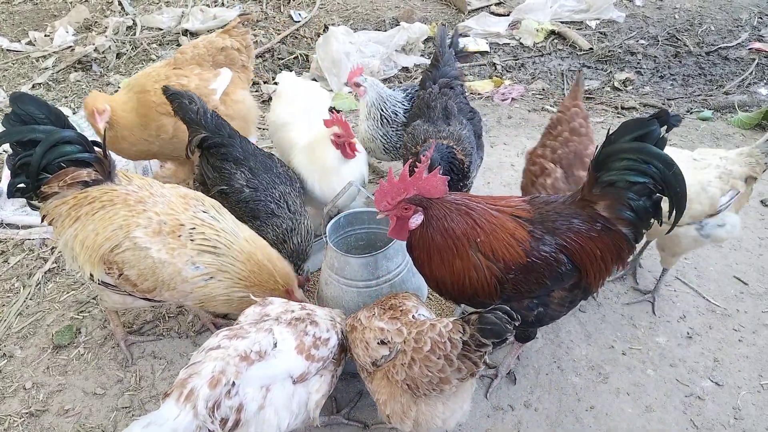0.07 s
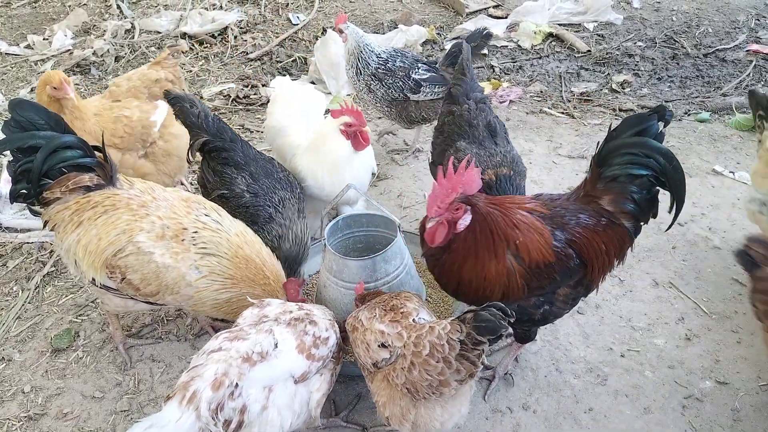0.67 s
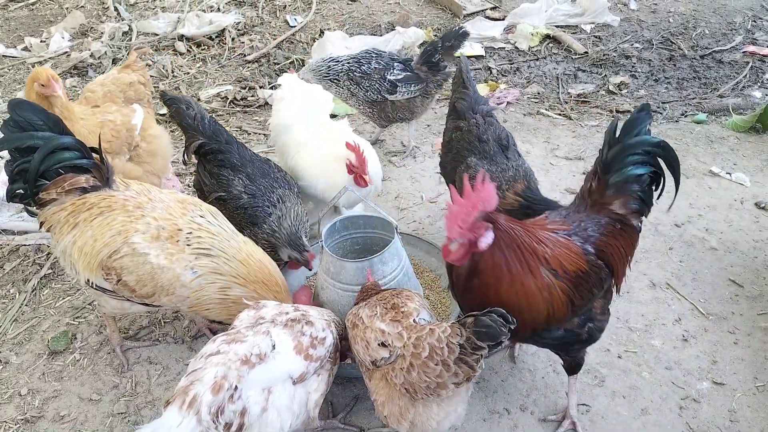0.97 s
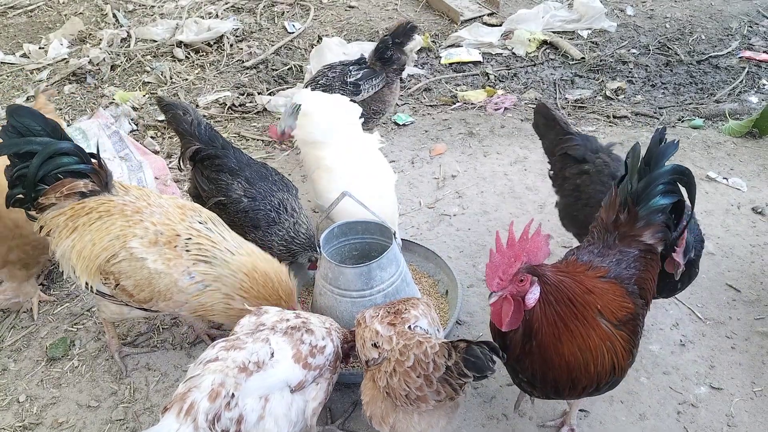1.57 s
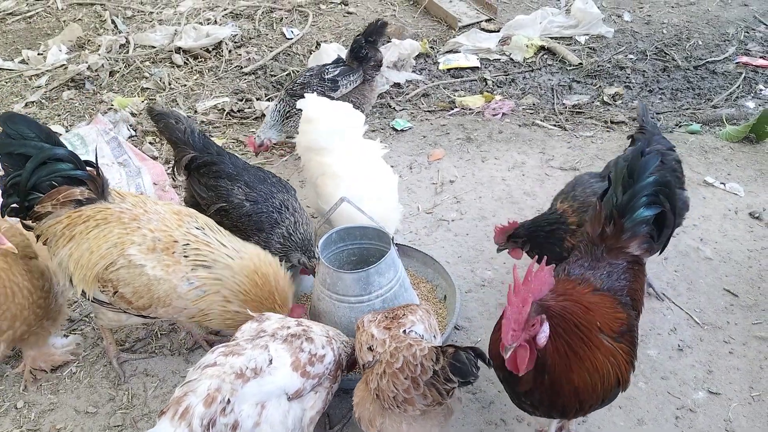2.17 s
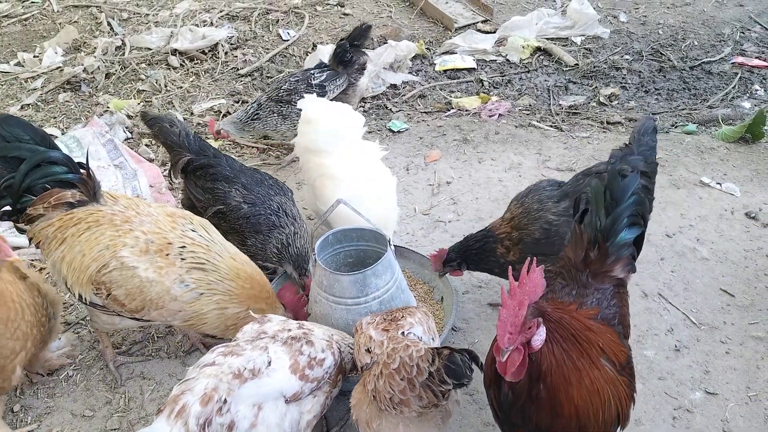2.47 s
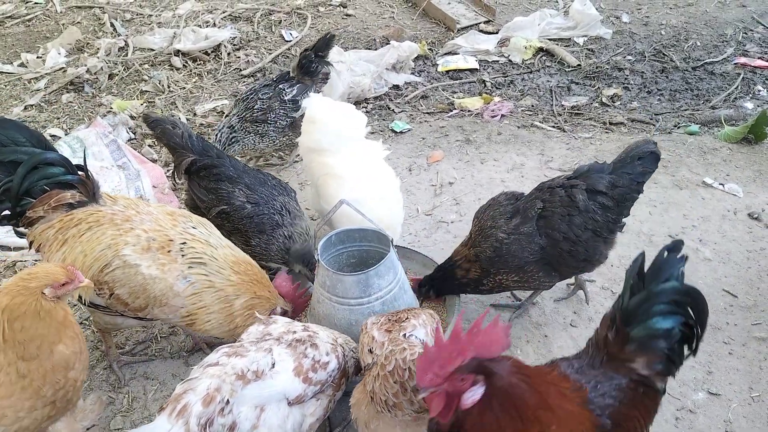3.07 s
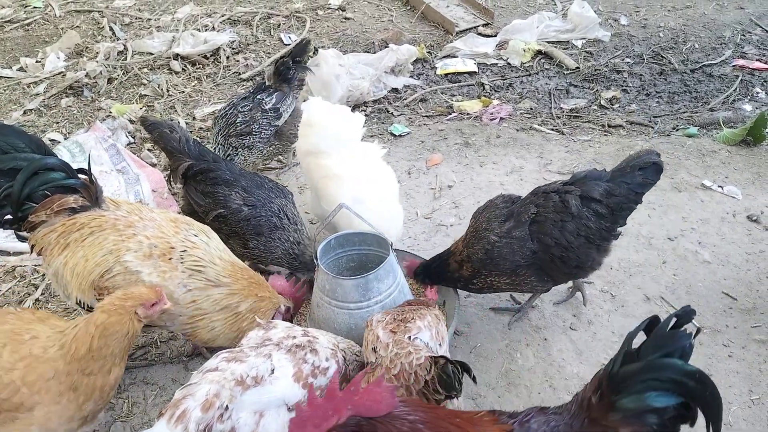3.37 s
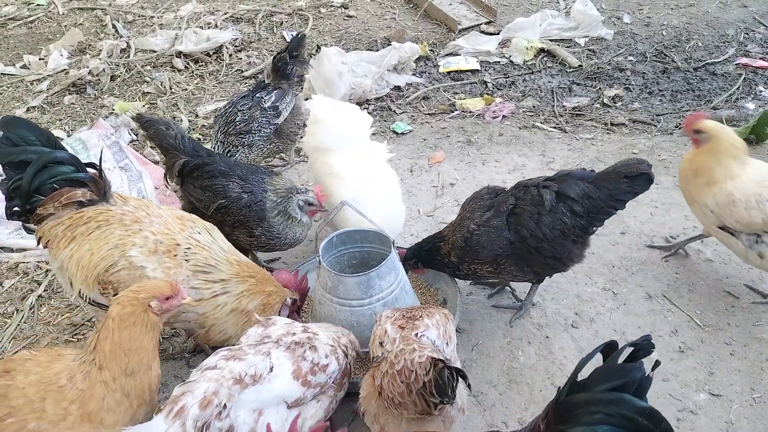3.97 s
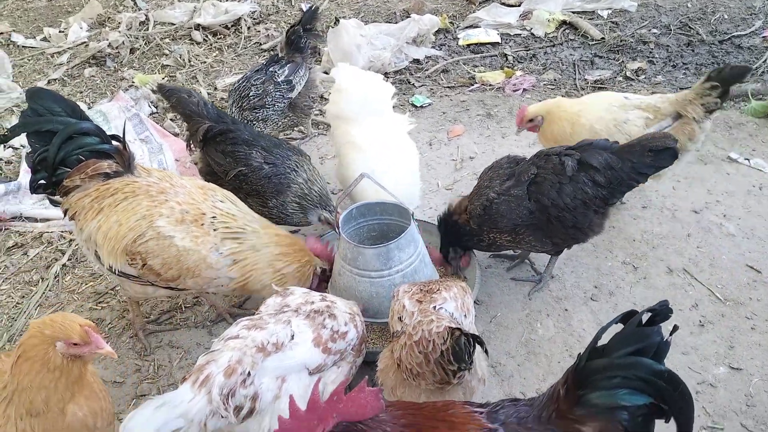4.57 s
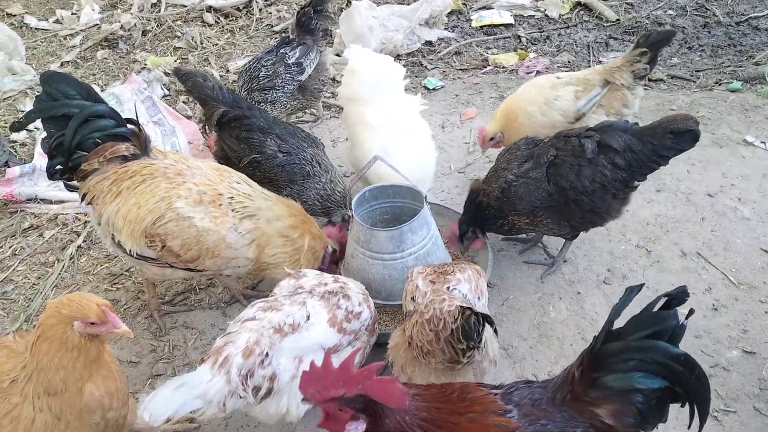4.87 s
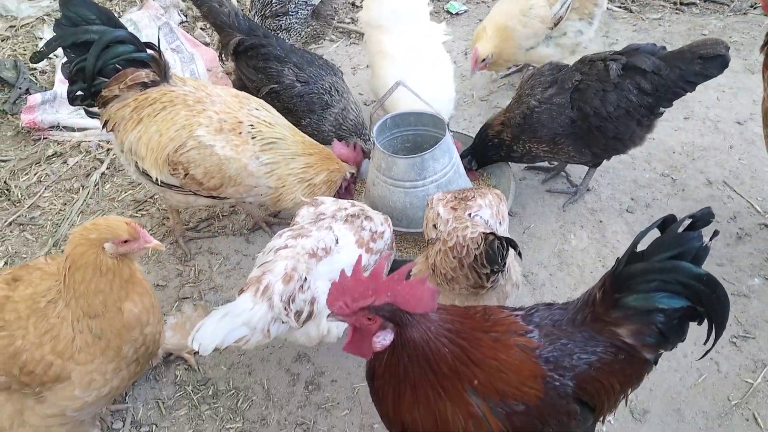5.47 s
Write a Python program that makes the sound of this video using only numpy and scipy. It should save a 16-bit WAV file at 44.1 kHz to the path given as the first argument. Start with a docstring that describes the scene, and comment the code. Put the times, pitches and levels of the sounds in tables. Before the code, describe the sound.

Close by in a quiet farm yard, a chicken scolds in a quick run of short hoarse squawks and ends on a brief low growl. Then the flock feeds: beaks swish through dry grain, click sharply on a metal pan and knock it dully against the ground. A few very soft clucks come later, over faint shuffling, with a short echo from nearby walls.

```python
"""Chickens crowd round a metal feeder in a farm yard, heard close by on one microphone.
One scolds in short hoarse squawks, puffs of air ringing in throat and mouth, and ends on a low growl.
Beaks stir the dry grain, click on the pan and knock it on the ground, with a few soft clucks between.
The other birds shuffle underneath in quiet outdoor air, and nearby walls give a short echo."""
import sys
import numpy as np
from scipy import signal
from scipy.fft import rfft, irfft, next_fast_len
from scipy.io import wavfile
from scipy.ndimage import uniform_filter1d

SR = 44100
rng = np.random.default_rng(int(sys.argv[2]) if len(sys.argv) > 2 else 0)


def persist_wave(psi):
    """Save psi, clipped to +-1, as 16-bit WAV."""
    counts = np.round(np.clip(psi, -1, 1) * 32767).astype(np.int16)
    wavfile.write(sys.argv[1], SR, np.atleast_2d(counts).T)


N = 242991

TOP_HZ = 16000  # upper limit of the voice's harmonics and of the microphone
# The colour of dry grain moving in the pan. Each row: frequency in Hz, gain in dB.
GRAIN_COLOUR = [(150, -20.5), (300, -13), (800, -9), (1500, -4), (2000, -4), (2500, 6.5), (3400, -2.5),
                (4000, 4), (4600, -4.5), (6000, 0.5), (7000, -8), (16000, -12.5)]


def amp(db):
    """Decibels to gain."""
    return 10 ** (np.asarray(db) / 20)


def unit(x):
    """Scale to rms 1."""
    return x / np.sqrt(np.mean(x ** 2) + 1e-20)


def crest(x, size):
    """Scale so that the loudest stretch of size samples has rms 1."""
    return x / np.sqrt(np.max(uniform_filter1d(x ** 2, size)) + 1e-20)


def along(points, hz):
    """Read (Hz, value) points at hz, on a log frequency axis."""
    freqs, values = np.transpose(points)
    return np.interp(np.log(hz + 1), np.log(freqs + 1), values)


def curves(rows, t):
    """Each column after the time, read at the times t."""
    times, *columns = np.transpose(rows)
    return [np.interp(t, times, column) for column in columns]


def filtered(x, response):
    """Pass x through a complex response, given as a function of Hz."""
    size = next_fast_len(len(x) + 8192)
    return irfft(rfft(x, size) * response(np.fft.rfftfreq(size, 1 / SR)), size)[:len(x)]


def coloured(x, colour):
    """Pass x through a curve of (Hz, dB) points."""
    return filtered(x, lambda f: amp(along(colour, f)))


def resonate(x, modes, order):
    """Pass x through (Hz, width in Hz, dB) resonances; a higher order has steeper skirts."""
    def band(f, hz, width):
        return (1j * f * width / (hz * hz - f * f + 1j * f * width)) ** order
    return filtered(x, lambda f: sum((-1) ** (k * order) * amp(db) * band(f, hz, width * np.sqrt(order))
                                     for k, (hz, width, db) in enumerate(modes)))


def add(track, start, sound):
    """Mix a sound in at start seconds."""
    i = max(round(start * SR), 0)
    track[i:i + len(sound)] += sound[:len(track) - i]


def scatter(x, share_db, reach_s=.009, count=8):
    """Ground, feeder and moving birds throw back a few close copies, new for every sound."""
    paths = np.zeros(int(reach_s * SR) + 20)
    gains = amp(share_db) * rng.standard_normal(count).clip(-1.5, 1.5) / np.sqrt(count)
    paths[rng.integers(18, len(paths), count)] = gains
    paths[0] = 1
    return signal.fftconvolve(x, paths)[:len(x)]


def yard_air(air_db=-72, drone_db=-80, drone_hz=86):
    """Quiet outdoor air all round the microphone, with a faint low drone."""
    # Still air in the yard. Each row: frequency in Hz, gain in dB.
    air_colour = [(25, -46.5), (60, -12.5), (86, 13.5), (110, 4), (170, 0.5), (300, -1), (600, -11.5),
                  (1200, -5.5), (3000, -25.5), (8000, -32.5), (16000, -36)]
    air = unit(coloured(rng.standard_normal(N), air_colour))
    drone = unit(resonate(rng.standard_normal(N), [(drone_hz, 5, 0)], order=2))
    return amp(air_db) * air + amp(drone_db) * drone


def kernels(n, per_s, spread_db, rub, tick_t60=.012):
    """Kernels of uneven size collide, each ticking at its own pitch, over a smooth rubbing noise."""
    count, t = int(n * per_s / SR) + 1, np.arange(SR // 100) / SR
    size, pitch = rng.standard_normal((2, count, 1)).clip(-2, 2)
    hz = 5000 * np.exp(.55 * pitch)
    envelope = amp(spread_db * size - 60 * t / tick_t60) * np.minimum(hz * t / 2, 1)
    ticks = envelope * np.sqrt(hz) * np.sin(2 * np.pi * hz * t)
    positions = rng.integers(0, n, (count, 1)) + np.arange(len(t))
    hits = np.bincount(positions.ravel(), ticks.ravel(), n)[:n]
    return unit(unit(hits) + rub * rng.standard_normal(n))


def tumble(t60, tilt_db, rise_s=.005):
    """Stirred kernels tumble in the pan and settle; the tilt is per octave, from 1.5 to 8 kHz."""
    def colour(f):
        return amp(along(GRAIN_COLOUR, f) + tilt_db * np.log2(np.clip(f, 1500, 8000) / 4000))
    t = np.arange(SR // 4) / SR
    ticks = scatter(kernels(len(t), per_s=2600, spread_db=4, rub=.55), share_db=-3)
    envelope = amp(-60 * np.maximum(t - rise_s, 0) / t60) * np.minimum(t / rise_s, 1)
    return envelope * unit(filtered(ticks, colour))


def flock(gain_db=2, nibbles_per_s=4.6, nibble_over_shuffle_db=13):
    """In the background the other birds shuffle and pick lightly at the grain at uneven intervals."""
    # How busy the flock is. Each row: time in seconds, relative level in dB.
    bustle = [(0.17, -57), (0.48, -71), (0.78, -63), (1.08, -72.5), (1.39, -57.5), (1.69, -67), (2.0, -72),
              (2.3, -66.5), (2.6, -69.5), (2.91, -76.5), (3.21, -69.5), (3.51, -67.5), (3.82, -64),
              (4.12, -67.5), (4.43, -69), (4.73, -59.5), (5.03, -65.5), (5.34, -63)]
    busy_db, = curves(bustle, np.arange(N) / SR)
    out = unit(coloured(kernels(N, per_s=1800, spread_db=3.5, rub=.9), GRAIN_COLOUR))
    for k, (late, force) in enumerate(rng.random((int(nibbles_per_s * N / SR), 2))):
        nibble = amp(nibble_over_shuffle_db) * 2 * force * tumble(t60=.09, tilt_db=2)
        add(out, (k + late) / nibbles_per_s, nibble)
    return amp(busy_db + gain_db) * out


def syrinx(pitch, rough, jitter, doubling):
    """One puff per cycle; roughness unsettles them, makes them strong and weak in turn and adds breath."""
    n, rough = len(pitch), np.clip(rough, 0, 1)
    unsteady, shimmer = (unit(uniform_filter1d(rng.standard_normal(n), size=110)) for _ in range(2))
    phase = np.cumsum(pitch * (1 + jitter * rough * unsteady)) / SR
    harmonics = np.arange(1, int(TOP_HZ / np.max(pitch)))
    strength = amp(3 * rough * shimmer) * (1 + doubling * np.sqrt(rough) * np.cos(np.pi * phase))
    puffs = unit(np.cos(2 * np.pi * np.outer(phase, harmonics)).sum(axis=1) * strength)
    breath = unit(rng.standard_normal(n) * (1 + np.cos(2 * np.pi * phase)) ** 2)
    breath_share = rough ** 2 / 2
    return np.sqrt(1 - breath_share) * puffs + np.sqrt(breath_share) * breath


def squawks(attack_s=.036, release_s=.028, pitch_sag=.1448, mouth_sag=.21, beak_hz=2570):
    """Each squawk or cluck swells and is cut short; pitch and brightness follow the bird's effort."""
    # Loud squawks, then soft clucks. Each row: start and length in seconds, level in dB, pitch in Hz,
    # roughness (full at 1), throat and mouth resonances in Hz, gain of the beak's sharp edge in dB.
    calls = [ (.1, 0.067, -22.5, 449.8, 0.84, 730, 1946, -2.5),
             (0.187, .036, -30.5, 400, 0.98, 775, 1680, -4), (.206, 0.035, -26, 416, 0.83, 950, 1530, -5),
             (0.35, 0.044, -27, 522.8, 0.5, 1060, 1370, -6),
             (0.543, 0.044, -27.5, 400, 0.77, 720, 1530, 3.5),
             (0.599, 0.11, -45.5, 208.5, 0.64, 482, 810, -16),
             (0.681, 0.092, -32.5, 371.3, 0.71, 793, 1130, -5),
             (0.759, .04, -35, 380.5, 0.74, 745, 1160, -8.5), (.785, .048, -31.5, 400, 0.83, 730, 1260, 3),
             (0.801, 0.051, -48.5, 231.4, 0.17, 248, 900, -18),
             (0.916, 0.05, -34.5, 382.7, 0.8, 810, 1050, -34),
             (0.956, 0.063, -29.5, 541.5, 0.55, 980, 1150, -10.5),
             (0.989, .052, -21.5, 337.1, .7, 850, 1340, -2), (1.057, .02, -25.5, 432, 1.17, 880, 1300, 0),
             (1.068, 0.039, -26, 639.7, .3, 880, 1290, -1.5),
             (1.082, 0.084, -41.5, 639, 0.04, 680, 1280, -11),
             (1.22, 0.055, -24, 334.2, .81, 850, 1500, -1), (1.285, .054, -31.5, 298.2, 0.86, 710, 1200, 0),
             (3.26, 0.0089, -61.5, 760, .3, 1400, 1550, -23),
             (3.301, 0.0085, -56.5, 803, 0.45, 1120, 1590, 4.5),
             (4.332, 0.083, -50.5, 507, 0.84, 1055, 1500, -20),
             (4.429, 0.16, -61.5, 500, .5, 1010, 1830, -9),
             (4.634, 0.064, -55.5, 487, 0.27, 1000, 1200, -14),
             (5.079, .27, -59, 473, 0.87, 950, 1570, -11)]
    # The overall colour of the voice. Each row: frequency in Hz, gain in dB.
    voice_colour = [(150, -6), (350, -3.5), (650, -4.5), (7000, -1.5), (9500, -1), (16000, -14.5)]
    out = np.zeros(N)
    for start, length, db, pitch_hz, rough, throat_hz, mouth_hz, edge_db in calls:
        t = np.arange(0, length, 1 / SR)
        attack = .1 + t / attack_s  # the voice catches with some effort already behind it
        ramp = np.minimum(np.minimum(attack, (length - t) / release_s), 1)
        effort = np.sin(np.pi / 2 * ramp / ramp.max())
        pitch = pitch_hz * (1 + pitch_sag * rough * (effort - 1))
        source = scatter(syrinx(pitch, rough, jitter=.15, doubling=.6), share_db=-2)
        throat = (throat_hz, 420, -17.5 * np.log2(mouth_hz / 1340))  # weaker under a higher mouth
        closing = resonate(source, [throat, (mouth_hz * (1 - mouth_sag), 460, 0)], order=2)
        wide = resonate(source, [throat, (mouth_hz, 460, 0)], order=2)
        body = closing + effort ** 2 * (wide - closing)
        rasp_db = edge_db - 11.5
        rasp = [(3900, 600, rasp_db - 16.5), (5700, 1000, rasp_db), (7300, 1500, rasp_db - 15.5)]
        edge = resonate(source, [(beak_hz, 480, edge_db)] + rasp, order=2)
        voice = coloured(body + edge * effort, voice_colour) * np.abs(effort) ** 1.91
        add(out, start, amp(db) * crest(voice, size=441))
    return out


def grain_sweeps(gain_db=-2):
    """Beaks plough sideways through the feed without reaching the pan."""
    # Each row: start in seconds, relative level in dB, t60 in seconds, tilt in dB per octave.
    strokes = [(.452, -39, 0.26, 2.5), (0.666, -37, 0.11, -10), (1.2, -42.5, 0.068, -4),
               (1.408, -38, 0.22, 5.5), (1.732, -43.5, 0.3, -0.5), (2.188, -34, 0.37, 5.5),
               (2.274, -44, 0.43, 0), (2.434, -47, 0.2, 0.5), (2.9, -51, 0.1, 14), (3.135, -51.5, 0.25, 1),
               (3.502, -43.5, 0.2, 6), (3.745, -33, 0.26, 6), (3.855, -41, 0.25, 1),
               (4.103, -41.5, 0.43, 1), (4.217, -39.5, .2, 4), (4.25, -39, 0.16, 2.5),
               (4.376, -41.5, 0.18, -4.5), (4.572, -39, .23, -4.5), (4.701, -39, 0.11, 0),
               (4.803, -28, 0.19, 6.5), (4.926, -44, 0.4, -1), (5.14, -38.5, 0.094, 5),
               (5.341, -43, 0.19, -9.5)]
    out = np.zeros(N)
    for start, db, t60, tilt_db in strokes:
        add(out, start, amp(db + gain_db) * tumble(t60, tilt_db, rise_s=.009))
    return out


def sharp_clicks(lead_in_db=-14, chatter_db=-8, chatter_t60=.04, treble_lift_db=10, ring_db=-33):
    """Beak strikes on the pan, and crackle in one squawk: each an impulse with chatter and a faint ring."""
    # Sharp clicks: beak strikes, and three ticks of crackle within the long rough squawk near 0.7 s.
    # Each row: time in seconds, level in dB, relative treble in dB, resonance in Hz.
    clicks = [(.521, -46, 1.5, 2520), (0.6952, -30.5, -24, 2790), (0.7086, -30.5, -26, 2450),
              (0.7242, -32, -14.5, 2910), (1.688, -40, -26, 2356), (1.755, -22.5, -21.5, 2400),
              (1.797, -26.5, -25, 2570), (2.013, -29.5, -19, 2215), (2.042, -25, -24.5, 2490),
              (2.909, -37.5, -21, 2690), (3.024, -41, -22, 2820), (3.368, -45.5, -13.5, 2840),
              (3.414, -31.5, -3.5, 2470), (4.071, -34, -41, 2620), (4.159, -35.5, -3, 2750),
              (4.306, -29, -19.5, 2530), (4.577, -36, -17, 2650), (4.6, -30.5, -32, 2700),
              (4.669, -42, 5, 2530), (4.956, -35, -8, 2640), (5.382, -22.5, -16, 2570)]
    # The damped pan's resonances. Each row: frequency in Hz, width in Hz, gain in dB.
    pan_modes = [(400, 217, -25), (1500, 4100, -26), (2910, 1200, -31), (4040, 580, -2), (5010, 410, -5.5),
                 (5520, 1050, -2), (12400, 2600, -21)]
    # The hopper's ringing tones. Each row: frequency in Hz, relative level in dB, t60 in seconds.
    hopper_modes = [(1510, -25.5, 0.29), (1940, -10, 0.4), (2987, -5.5, 0.82)]
    out, t = np.zeros(N), np.arange(-SR // 200, SR // 3) / SR
    after = np.maximum(t, 0)
    for time, db, treble_db, click_hz in clicks:
        noise_db = np.where(t < 0, lead_in_db + 2000 * t, chatter_db - 60 * t / chatter_t60)
        noise = amp(noise_db) * rng.standard_normal(len(t)) / 4
        impulse = scatter(noise + (t == 0), share_db=-7.5)
        # The balance of the resonances shifts from click to click.
        modes = [(hz, width, level + 2 * rng.standard_normal())
                 for hz, width, level in sorted(pan_modes + [(click_hz, 380, 0)])]
        click = resonate(impulse, modes, order=2)
        click = coloured(click, [(3000, .004), (5500, treble_db + treble_lift_db)])
        ring = sum(amp(level + rng.normal(0, 5.5) - 60 * after / t60) * np.sin(2 * np.pi * hz * after)
                   for hz, level, t60 in hopper_modes)
        add(out, time + t[0], amp(db) * (crest(click, size=88) + amp(ring_db) * ring))
    return out


def growl(gain_db=-3, fade_s=.016, open_below_hz=236, shut_above_hz=283):
    """A low drawn-out note that breaks to a lower register as the beak opens."""
    # The note's course. Each row: time in seconds, pitch in Hz, relative level in dB, relative roughness.
    contour = [(1.33, 237.2, -36, 0.79), (1.412, 284.4, -40, 0.22), (1.438, 262.4, -42, 0.58),
               (1.458, 306.4, -38.5, 0.08), (1.49, 294.5, -38, 0.6), (1.514, 213, -40.5, 0.69),
               (1.562, 216, -38, 0.54), (1.585, 186, -39.5, 0.74)]
    # Throat resonances, beak nearly shut. Each row: frequency in Hz, width in Hz, gain in dB.
    shut_modes = [(262, 210, -5), (950, 157, 2), (2400, 240, -11), (3870, 220, -16), (6500, 2300, -46)]
    # Throat resonances, beak open. Each row: frequency in Hz, width in Hz, gain in dB.
    open_modes = [(230, 64, -5), (617, 210, 5.5), (1096, 215, 13), (2250, 180, 0), (4430, 450, -9)]
    out, t = np.zeros(N), np.arange(contour[0][0], contour[-1][0], 1 / SR)
    pitch, db, rough = curves(contour, t)
    opening = np.clip((shut_above_hz - pitch) / (shut_above_hz - open_below_hz), 0, 1)
    source = syrinx(pitch, .77 * rough, jitter=.1, doubling=.27)
    shut, wide = (unit(resonate(source, modes, order=2)) for modes in (shut_modes, open_modes))
    voice = np.sqrt(1 - opening) * shut + np.sqrt(opening) * wide
    fade = np.clip(np.minimum(t - t[0], t[-1] - t) / fade_s, 0, 1)
    add(out, t[0], amp(db + gain_db) * fade * voice)
    return out


def knocks(rock_db=-36, rock_t60=.095, jump_db=-2):
    """A hard peck makes the grain jump and thumps the loaded pan, which rocks briefly on the soil."""
    # Deep thrusts. Each row: time in seconds, thud level in dB, thud pitch in Hz, then the grain's
    # relative level in dB, t60 in seconds and tilt in dB per octave.
    thrusts = [(1.875, -55.5, 430, -39.5, 0.14, 0), (2.139, -44, 303, -34.5, 0.17, -2),
               (2.624, -47.5, 306, -43.5, .18, -3), (3.179, -56, 372, -48.5, 0.22, -1.5),
               (3.428, -56, 326, -41, 0.24, 3.5), (3.677, -45, 295, -32.5, 0.56, -1.5),
               (3.993, -45.5, 365, -49.5, .1, 4), (4.064, -45.5, 291, -39, 0.13, 2.5),
               (4.744, -26.5, 404, -30, 0.16, -2.5), (4.855, -44.5, 338, -29.5, .13, -1),
               (5.063, -56.5, 445, -42, 0.084, 0.5), (5.197, -42.5, 320, -34, 0.22, -0.5),
               (5.38, -53.5, 530, -27, 0.15, -4.5), (5.436, -48.5, 387, -36.5, 0.074, -11)]
    out, t = np.zeros(N), np.arange(SR // 4) / SR
    for time, db, thud_hz, grain_db, grain_t60, tilt_db in thrusts:
        push = amp(rock_db - 60 * t / rock_t60) * rng.standard_normal(len(t))
        push[0] += 1
        modes = [(270, 70, -9), (thud_hz, 125, 0), (580, 170, -11), (1120, 260, -23), (1450, 250, -19)]
        thud = resonate(push, modes, order=3)
        add(out, time - .001, amp(db) * crest(thud, size=132))
        jump = amp(grain_db + jump_db) * tumble(grain_t60, tilt_db)
        add(out, time - .0054, jump)  # the beak meets the grain before the pan
    return out


def wall_echo(x, delay_s):
    """Nearby walls return a short echo that dies faster in the treble."""
    # The echo's decay. Each row: frequency in Hz, t60 in seconds.
    decay_times = [(200, 0.28), (1400, 0.15), (4000, 0.14), (10000, 0.12)]
    hz, t, spectrum = signal.stft(rng.standard_normal(SR // 2), SR, nperseg=256)
    decay = amp(-60 * t / along(decay_times, hz)[:, None])
    tail = signal.istft(spectrum * decay, SR, nperseg=256)[1]
    delayed = np.pad(x, (round(delay_s * SR), 0))
    return signal.fftconvolve(delayed, tail / np.linalg.norm(tail))[:N]


def scene():
    """The yard from beside the feeder, in mono: voices and clatter up front, echo and air behind."""
    voices = squawks() + growl()
    clatter = sharp_clicks() + knocks() + grain_sweeps() + flock()
    echo = amp(-8.5) * (wall_echo(voices, delay_s=.0044) + wall_echo(clatter, delay_s=.005))
    return (voices + clatter + echo + yard_air())[None]


def record(dry):
    """The microphone has a deep dip around 9.5 kHz and passes nothing above its upper limit."""
    # The microphone's response. Each row: frequency in Hz, gain in dB.
    mic_response = [(30, -12), (200, 6), (6500, -1), (7300, -0.5), (8200, -18), (9500, -22), (11000, -15),
                    (12500, -5), (15500, -10.5)]
    return np.array([filtered(ch, lambda f: amp(along(mic_response, f)) * (f < TOP_HZ)) for ch in dry])


dry = scene()
out = record(dry)
persist_wave(out)
```